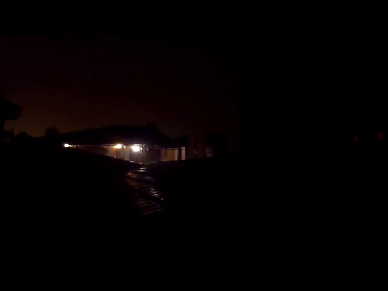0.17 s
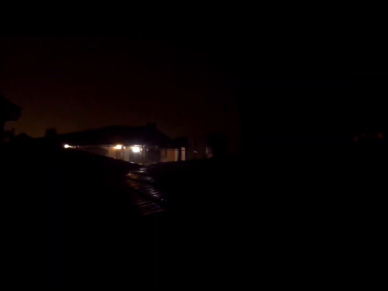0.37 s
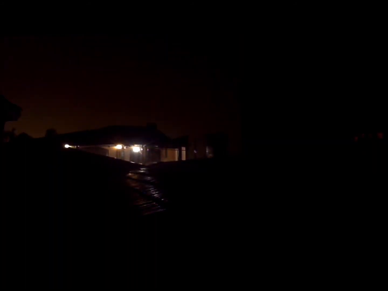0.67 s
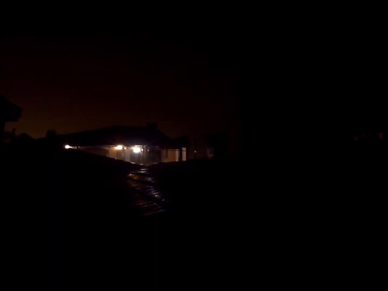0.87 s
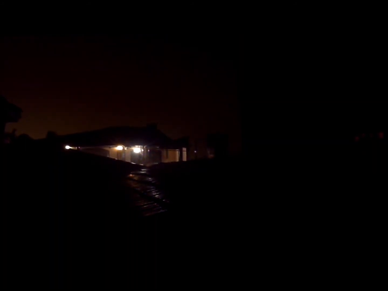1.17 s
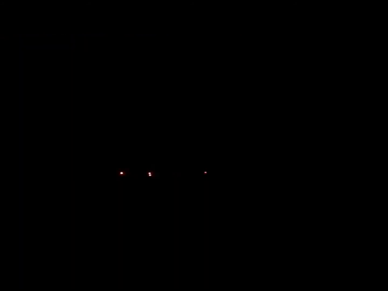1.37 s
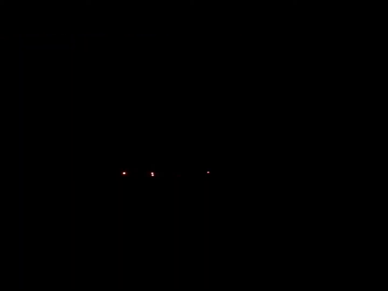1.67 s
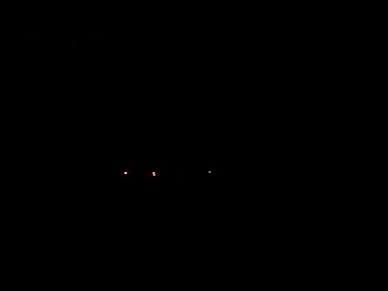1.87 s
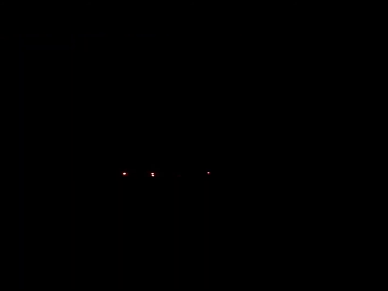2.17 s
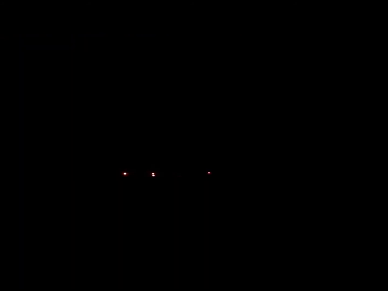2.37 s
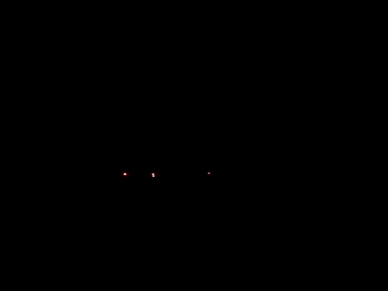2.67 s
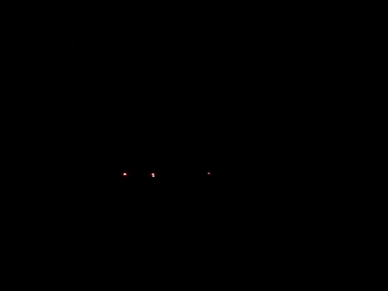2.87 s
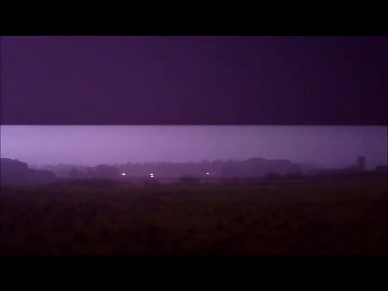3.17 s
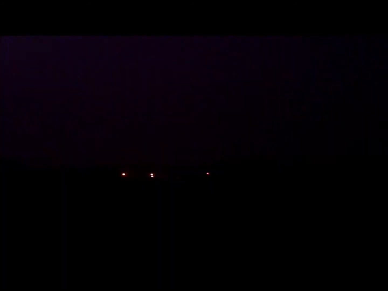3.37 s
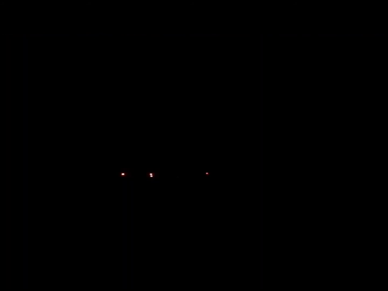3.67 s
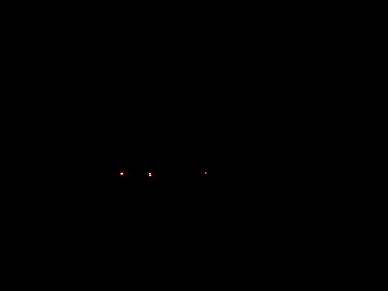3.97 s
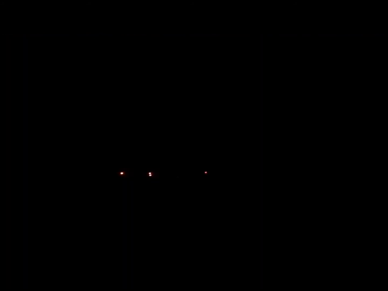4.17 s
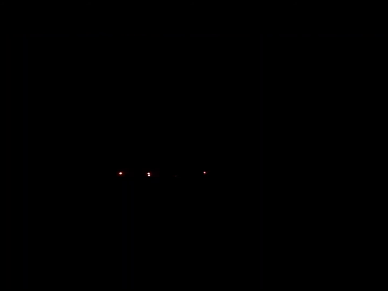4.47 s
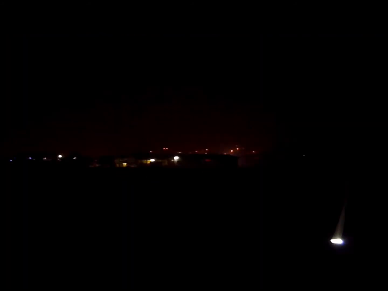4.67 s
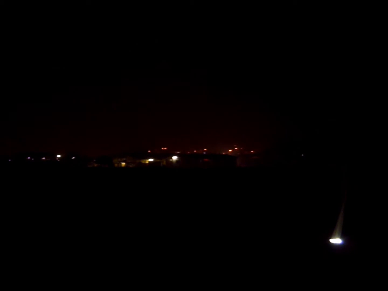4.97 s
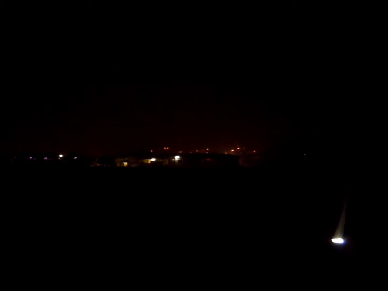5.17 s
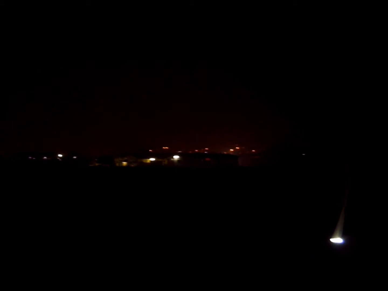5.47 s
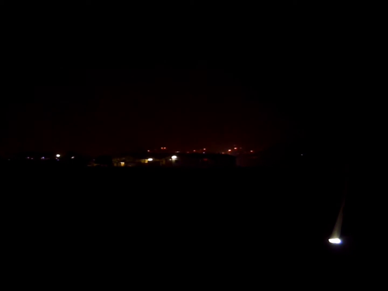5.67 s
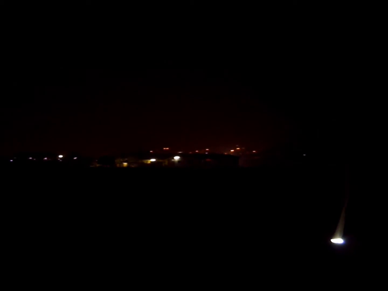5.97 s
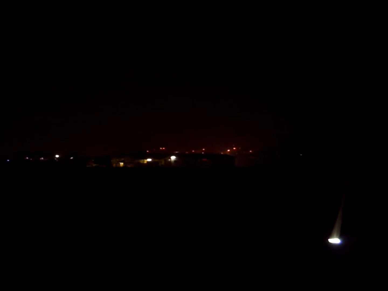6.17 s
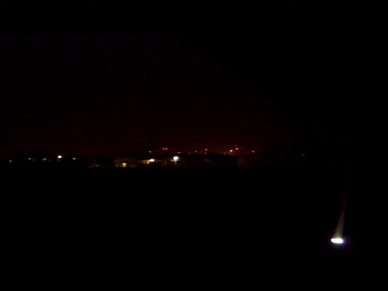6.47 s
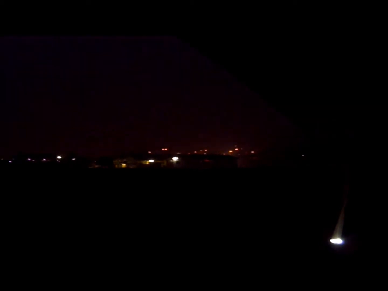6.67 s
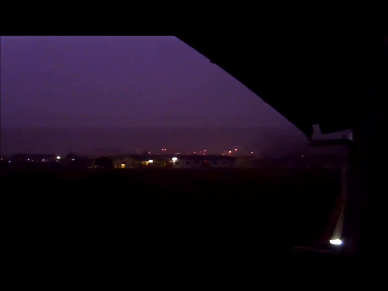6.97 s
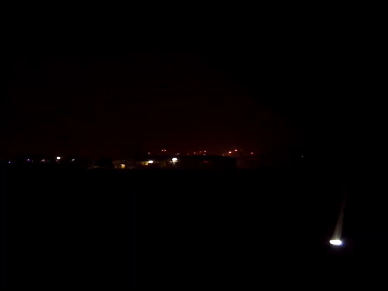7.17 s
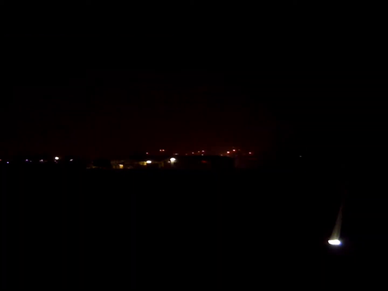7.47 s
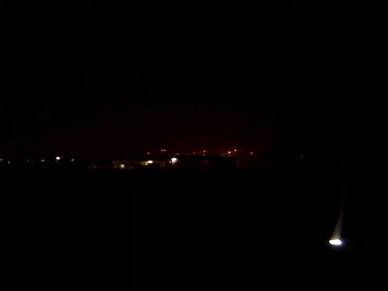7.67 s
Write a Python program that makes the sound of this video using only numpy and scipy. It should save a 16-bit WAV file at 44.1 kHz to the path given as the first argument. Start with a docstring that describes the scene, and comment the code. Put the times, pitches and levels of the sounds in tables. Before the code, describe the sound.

Soft distant rain wash gives way to near dripping on tiles and watery plinks, before a booming, crackling thunderclap and a fainter answering rumble.

```python
"""Night rain and thunder from under the eaves

Near drops tick, slap and spray on tiles as shaped noise; heavy drips splash and standing water plinks
with short rising tones. A wash of countless far drops lies behind, and gusts push the rain harder.
Thunder grumbles as coloured noise, swells, breaks in a cluster of noise-volley claps and answers once
more, with scattered echoes from walls and roofs."""
import sys
import numpy as np
from scipy import signal
from scipy.fft import rfft, irfft
from scipy.io import wavfile

SR = 44100
rng = np.random.default_rng(int(sys.argv[2]) if len(sys.argv) > 2 else 0)


def unload_wav(signal):
    """Save mono or channel-first audio to the path in sys.argv[1] as 16-bit WAV at rate SR, clipped to [-1, 1]."""
    wavfile.write(
        sys.argv[1],
        SR,
        np.round(np.clip(np.atleast_2d(signal).T, -1, 1) * 32767).astype(np.int16),
    )


N = 344421

# Spectrum of the far rain's wash: [f/Hz, relative level/dB]
WASH_COLOUR = [(30, -4.5), (130, 2.5), (1000, 0), (1550, -5), (2050, -2), (2450, 2), (3100, -8.5),
               (4800, -32), (6800, -21.5), (8000, -21.5), (9200, -16), (12000, -37), (14500, -35),
               (15800, -70)]
# Spectrum of a drop's slap on the tile: [f/Hz, relative level/dB]
SLAP_COLOUR = [(150, -12), (400, 0), (700, 2.5), (1030, 4), (1650, -3), (2100, -4.5), (2500, 2),
               (3300, -9.5), (4600, -24), (8000, -36)]
# Spectrum of a drop's fine spray: [f/Hz, relative level/dB]
SPRAY_COLOUR = [(2000, 7.5), (3900, 5.5), (4900, -24), (5500, -21), (6800, 9), (8000, 6), (9100, 16.5),
                (10300, 5.5), (12000, -7), (14300, -5), (15800, -33)]
# Resonances of a drop's first contact: [f/Hz, width/Hz, relative level/dB]
TICK_BANDS = [(2370, 680, 2.5), (3660, 420, -7), (6230, 1860, -0.5), (7680, 950, -6), (9900, 1800, -2),
              (13000, 3200, -12)]
# Big splashes on the tiles: [t/s, slap level before trim/dB, wetness of the tile/0-1]
SPLASHES = [(1.493, -39, .35), (1.6104, -38, 1), (1.761, -35.5, 0.1), (2.3398, -45, .9),
            (2.3494, -35.5, 0.44), (2.4914, -42, 0.53), (2.7943, -38, 0.56), (3.3855, -36, .03),
            (3.4885, -35, 0.17), (3.896, -35, .35), (4.0153, -34.5, 0.22), (4.2476, -37.5, 0.3),
            (4.6633, -34, 0.26), (4.7723, -32, 0.1), (5.2834, -43, .9), (5.67, -31.5, 0),
            (5.7143, -31, .03), (6.4263, -26.5, 0), (7.1026, -34.5, 0.57), (7.4475, -33.5, 0.36),
            (7.7866, -41, .3)]
# Drops into standing water: [t/s, level before trim/dB, starting pitch f/Hz]
PLINKS = [(2.255, -30, 2220), (2.432, -38.5, 2330), (2.492, -36.5, 920), (2.888, -33, 2260),
          (4.246, -33.5, 2380), (4.346, -35, 2275), (4.810, -29, 2380), (4.924, -41, 2350)]
# Thunderclaps: [t/s, level before crack and boom trims/dB, nominal length/s, boom pitch f/Hz]
CLAPS = [(5.924, -20.5, 0.042, 227), (5.983, -16, .024, 58), (5.996, -19, .025, 306),
         (6.038, -16, 0.047, 161), (6.093, -24, 0.031, 318), (6.15, -25, 0.024, 167),
         (6.205, -22, .045, 270), (6.266, -22.5, 0.052, 158), (6.341, -20.5, 0.042, 188),
         (6.991, -24.5, 0.036, 180), (7.055, -25.5, 0.026, 86), (7.21, -29, 0.02, 207),
         (7.261, -25.5, 0.023, 190)]
# Spectrum of the deep rumble: [f/Hz, relative level/dB]
RUMBLE_COLOUR = [(12, -9), (28, -0.5), (55, -1.5), (90, -2), (150, -10.5), (400, -54)]
# Spectrum of the claps' crack and the rolls' growl: [f/Hz, relative level/dB]
THUNDER_COLOUR = [(25, -30.5), (95, -1), (160, 2), (310, -6), (450, -9), (750, -13.5), (1100, -27),
                  (1800, -47), (4000, -72), (12000, -105)]
# Gusts that throw more rain on the roof: [peak t/s, half-length/s, boost level/dB]
GUSTS = [(4.824, .1, 2), (5.34, 0.028, 7.5), (5.65, 0.17, 6), (6.534, 0.3, 4), (7.13, 0.074, 5),
         (7.386, .12, 4.5)]
# Rolls of thunder: [peak t/s, rumble level/dB, rise/s, decay/s, growl level relative to rumble/dB]
ROLLS = [(.62, -43.5, .4, 0.33, -13), (1.26, -46.5, 0.097, 0.42, -1.5), (4.8, -41.5, 0.14, .4, 0.5),
         (5.12, -35, 0.2, 0.14, -3), (5.34, -35.5, 0.043, 0.098, 1), (5.6, -41, .12, 0.1, 5.5),
         (5.82, -36, 0.034, .06, -3), (6.03, -29.5, 0.044, .3, 3.5), (6.45, -45, 0.16, .3, 11.5),
         (6.71, -45, .05, 0.13, 11.5), (7.27, -41, 0.27, 0.2, 8)]

NEAR_START_S, PATTER_DB = 1.49, -54.5  # near drops are heard from here on; base gain of their patter
LOUDER_S, LOUDER_FADE_S, LOUDER_DB = 4.46, 0.35, 3  # the rain sounds louder from here on
DRIPS_PER_S, DRIP_DB, DRIP_SPREAD_DB = 7, -42, 1.5  # lesser drips; level before the splash trim
SPRAY_DRY_DB, SPRAY_WET_DB = -11, 6.5  # spray relative to the slap
TICK_DRY_DB, TICK_WET_DB = -7.5, -33  # contact tick relative to the slap
WASH_DB, WASH_GUST_SHARE = -42, 0.52  # far rain: base level, share of each surge in dB it follows
STORM_RUMBLE_DB, STORM_GROWL_DB = -48.5, -52  # the far storm never quite falls silent
TOP_HZ = 15500  # upper edge of the finished sound


def near_rain(spray_db=-3.5, slap_db=8, slap_alone=0.23, tick_db=-5.5, tick_decay_s=0.0083,
              knock_db=-2, mist_db=-62):
    """Drops on the nearest tiles tick, slap and spray; some only slap."""
    drops = shower(rate=130, spread_db=4.5)
    dull_drops = shower(rate=64, spread_db=7.5)
    spray = colour(splatter(drops, decay_s=0.02, rise_s=0.00044), SPRAY_COLOUR)
    slap_energy = drops + slap_alone * dull_drops
    slap = colour(splatter(slap_energy, decay_s=0.017, rise_s=0.00051), SLAP_COLOUR)
    ticks = np.zeros(N)
    for hz, width_hz, db in TICK_BANDS:
        # every drop shares its energy differently among the resonances
        band_energy = drops * rng.random(N) ** 3
        ticks += undb(db) * snap(band_energy, hz, width_hz, tick_decay_s)
    ticks = unit(ticks)
    # now and then a drop knocks a tile into a short ring
    knocks = unit(snap(shower(rate=25, spread_db=11.0), hz=2480, width_hz=730, decay_s=0.0056))
    patter = undb(spray_db) * spray + undb(slap_db) * slap
    patter += undb(tick_db) * ticks + undb(knock_db) * knocks
    # the finest droplets fizz at a steady level, whatever the gusts do
    droplets = np.sqrt(shower(rate=4000, spread_db=9)) * rng.standard_normal(N)
    mist = unit(colour(droplets, SPRAY_COLOUR))
    heard = seconds() > NEAR_START_S
    return heard * (undb(PATTER_DB + surge()) * patter + undb(mist_db) * mist)


def big_splashes(gain_db=-2.0):
    """Heavy drips from the eaves slap the tiles: a dry tile ticks, a wet one throws spray."""
    spray, slap, contacts = np.zeros((3, N))
    for s, db, wet in list(SPLASHES) + drips():
        size = undb(db + gain_db)
        spray_gain = undb(np.interp(wet, [0, 1], [SPRAY_DRY_DB, SPRAY_WET_DB]))
        tick_gain = undb([np.interp(wet, [0, 1], [TICK_DRY_DB, TICK_WET_DB])])
        add(slap, s, size * burst(decay_s=0.016, rise_s=0.00022))
        add(spray, s, size * spray_gain * burst(decay_s=0.0062, rise_s=0.00008))
        add(contacts, s, (size * tick_gain) ** 2)  # one-sample energy
    ticks = snap(contacts, hz=5920, width_hz=1300, decay_s=0.0025)
    spray_sound = colour(spray * rng.standard_normal(N), SPRAY_COLOUR)
    slap_sound = colour(slap * rng.standard_normal(N), SLAP_COLOUR)
    return ticks + spray_sound + slap_sound


def drips():
    """Lesser drips from the eaves, loosely spaced: rows like those of SPLASHES."""
    rows = []
    for k, (late, size, wet) in enumerate(rng.random((80, 3))):
        s = NEAR_START_S + (k + late) / DRIPS_PER_S
        rows.append((s, DRIP_DB + DRIP_SPREAD_DB * (2 * size - 1), wet))
    return rows


def plinks(gain_db=-1, splash_db=-3):
    """A drop breaks the water with a short wet pop; its trapped bubble rings briefly, rising a little."""
    out = np.zeros(N)
    ring_shape = burst(decay_s=0.0061, rise_s=0.0038)
    pop_shape = burst(decay_s=0.0042, rise_s=0.00017)
    t = np.arange(len(ring_shape)) / SR
    for s, db, hz in PLINKS:
        ring = np.sin(2 * np.pi * hz * t * (1 + t))
        pop = unit(resonate(rng.standard_normal(len(t)), hz, q=2.6))
        add(out, s, undb(db + gain_db) * (ring_shape * ring + undb(splash_db) * pop_shape * pop))
    return out


def claps(boom_db=-1, crack_db=-3.0, boom_q=1.75, edge=4):
    """Each kink of the lightning channel sends a volley of shocks: a broad crack and a pitched boom."""
    out, t = np.zeros(N), np.arange(SR // 4) / SR
    for s, db, length_s, hz in CLAPS:
        shape = np.exp(-np.abs(1.5 * t / length_s - 1) ** edge)
        volley = shape * rng.standard_normal((2, len(t)))
        crack = unit(colour(volley[0], THUNDER_COLOUR))
        boom = unit(resonate(volley[1], hz, boom_q))
        # set the energy by the volley's nominal length, not by the whole buffer
        size = undb(db) * np.sqrt(length_s / t[-1])
        add(out, s, size * (undb(crack_db) * crack + undb(boom_db) * boom))
    return out


def echoes(x, t60_s=2.8, wet_db=-14):
    """Scattered reflections from walls and roofs: sparse random taps that die away."""
    t = np.arange(SR * 2) / SR
    taps = (rng.random(len(t)) < 120 / SR) * rng.standard_normal(len(t)) * (t > .03)
    response = taps * np.exp(-np.log(1000) * t / t60_s)
    return undb(wet_db) * signal.oaconvolve(x, response / np.linalg.norm(response))[:N]


def roll():
    """Shocks from far along the lightning channel arrive smeared into a rumble and a lumpy growl."""
    rumble_power, growl_power = undb(STORM_RUMBLE_DB) ** 2, undb(STORM_GROWL_DB) ** 2
    for s, db, rise_s, decay_s, growl_db in ROLLS:
        power = (undb(db) * swell(s, rise_s, decay_s)) ** 2
        rumble_power = rumble_power + power
        growl_power = growl_power + power * undb(growl_db) ** 2
    rumble = unit(colour(rng.standard_normal(N), RUMBLE_COLOUR))
    shocks = np.sqrt(shower(rate=900, spread_db=4)) * rng.standard_normal(N)
    growl = unit(colour(shocks, THUNDER_COLOUR) * undb(walk(rate=18)))
    return rumble * np.sqrt(rumble_power) + growl * np.sqrt(growl_power)


def swell(peak_s, rise_s, decay_s):
    """Envelope of a roll: it gathers smoothly, then dies away."""
    t = seconds() - peak_s
    return np.exp(-(np.minimum(t, 0) / rise_s) ** 2 - np.maximum(t, 0) / decay_s)


def far_rain():
    """Thousands of tiny impacts a second merge into a smooth wash."""
    ticks = np.sqrt(shower(rate=9000, spread_db=1.5)) * rng.standard_normal(N)
    return unit(colour(ticks, WASH_COLOUR)) * undb(WASH_DB + WASH_GUST_SHARE * surge())


def surge():
    """How much louder than at first the rain sounds, in dB: a higher level from LOUDER_S on, plus gusts."""
    t = seconds()
    louder = LOUDER_DB * np.clip((t - LOUDER_S) / LOUDER_FADE_S, 0, 1)
    return louder + sum(db * np.exp(-((t - s) / half_s) ** 2) for s, half_s, db in GUSTS)


def shower(rate, spread_db):
    """Energies of drops that land at random, rate per second, of uneven size with the largest capped."""
    lands, size = rng.random(N) < rate / SR, rng.standard_normal(N)
    energy = np.zeros(N)
    energy[lands] = undb(spread_db * np.minimum(size[lands], 1.8)) ** 2
    return energy


def splatter(drops, decay_s, rise_s):
    """Every drop bursts into droplets, a short puff of noise."""
    energy = np.abs(signal.oaconvolve(drops, burst(decay_s, rise_s) ** 2)[:N])
    return unit(np.sqrt(energy) * rng.standard_normal(N))


def snap(drops, hz, width_hz, decay_s):
    """A drop's sharp first contact: a noise burst through the band of the spot it strikes."""
    energy = np.abs(signal.oaconvolve(drops, burst(decay_s, rise_s=.0001) ** 2)[:N])
    edges = [hz - width_hz / 2, min(hz + width_hz / 2, SR * .45)]
    spot = signal.butter(2, edges, "bandpass", fs=SR, output="sos")
    contact = signal.sosfilt(spot, np.sqrt(energy) * rng.standard_normal(N))
    return contact * np.sqrt(SR / 2 / width_hz)  # make up the power lost outside the band


def burst(decay_s, rise_s):
    """Envelope of a splash: quick rise, exponential fall, peak 1."""
    t = np.arange(SR // 8) / SR
    shape = (1 - np.exp(-t / rise_s)) * np.exp(-t / decay_s)
    return shape / shape.max()


def resonate(x, hz, q):
    """Two passes through one resonance."""
    band = signal.iirpeak(hz, q, fs=SR)
    return signal.lfilter(*band, signal.lfilter(*band, x))


def colour(x, points):
    """Causal minimum-phase filter with the given spectrum; white noise keeps its power."""
    hz, db = np.transpose(points)
    size = 8192
    bins_hz = np.arange(size // 2 + 1) * SR / size
    gain = unit(undb(np.interp(np.log(bins_hz + 1), np.log(hz), db)))
    # fold the cepstrum forward in time so the filter speaks at once
    cepstrum = irfft(np.log(gain))
    cepstrum[1:size // 2] *= 2
    cepstrum[size // 2 + 1:] = 0
    return signal.oaconvolve(x, irfft(np.exp(rfft(cepstrum))))[:len(x)]


def walk(rate):
    """Random levels, rate per second, joined by straight lines and scaled to rms 1."""
    return unit(np.interp(seconds() * rate, np.arange(1000), rng.standard_normal(1000)))


def add(track, s, sound):
    """Lay a sound into a track at time s."""
    i = max(int(s * SR), 0)
    track[i:i + len(sound)] += sound[:max(N - i, 0)]


def seconds():
    """Time of every sample."""
    return np.arange(N) / SR


def undb(db):
    """Decibels to gain."""
    return 10 ** (np.asarray(db) / 20)


def unit(x):
    """Scale to rms 1."""
    return x / np.sqrt(np.mean(x ** 2) + 1e-18)


def scene():
    """Rain near and far under the thunder."""
    thunder = claps()
    rain = near_rain() + big_splashes() + plinks() + far_rain()
    return (rain + thunder + echoes(thunder) + roll())[None]


def record(dry):
    """A steep low-pass takes off the top of the treble."""
    return signal.sosfilt(signal.ellip(10, .2, 80, TOP_HZ, fs=SR, output="sos"), dry)


dry = scene()
out = record(dry)
unload_wav(out)
```